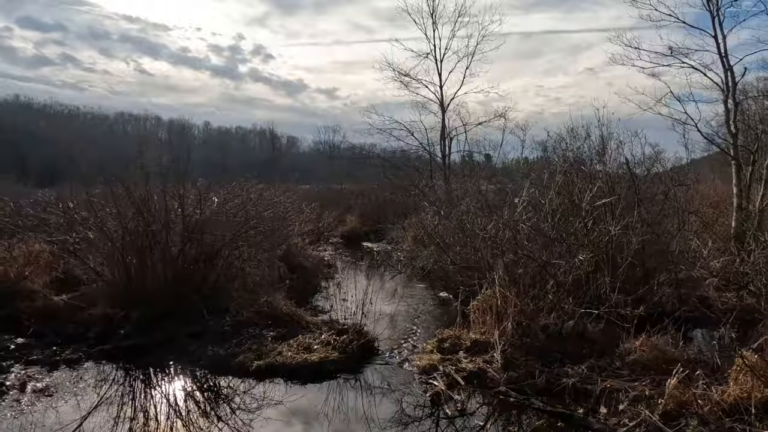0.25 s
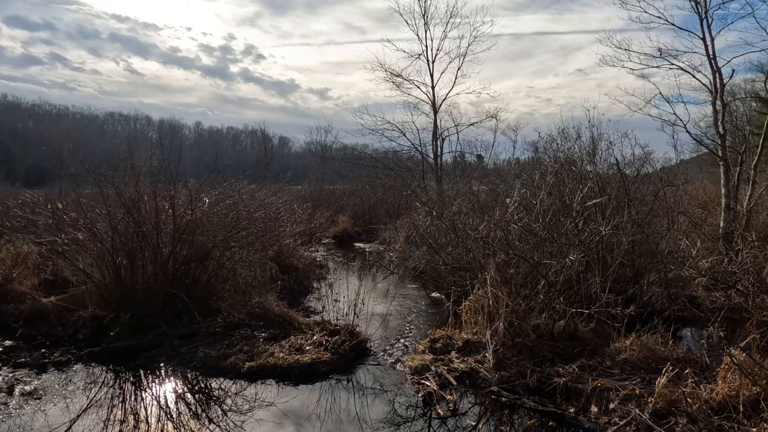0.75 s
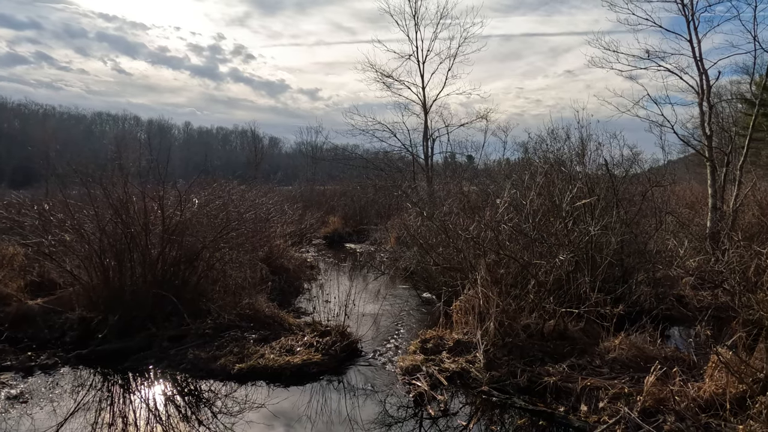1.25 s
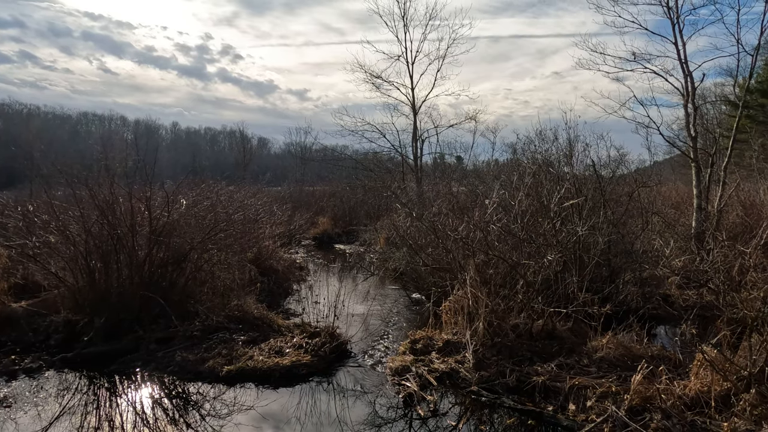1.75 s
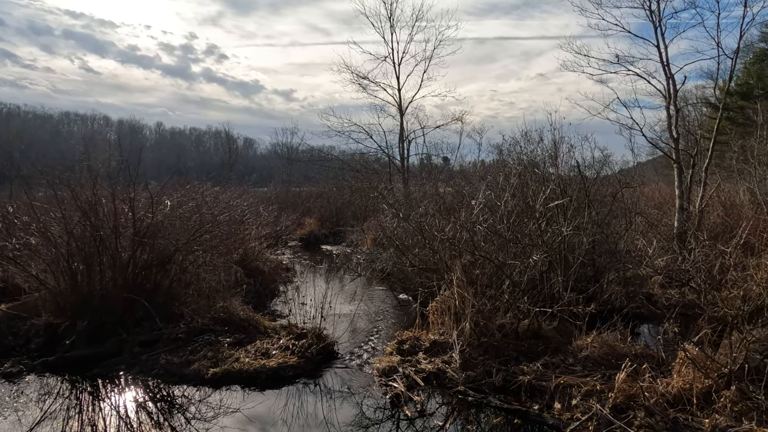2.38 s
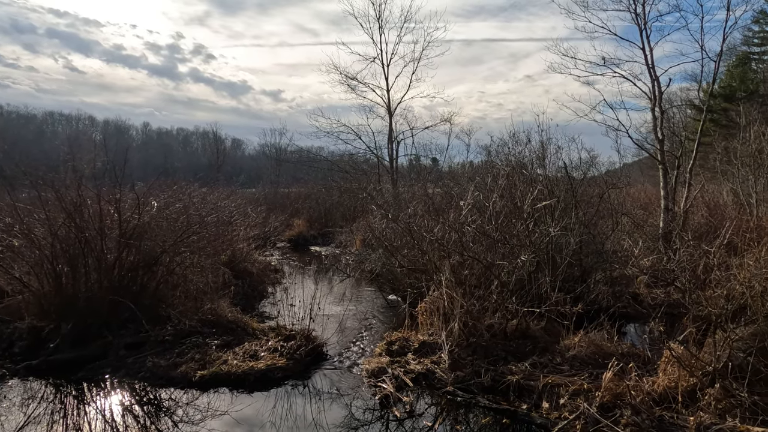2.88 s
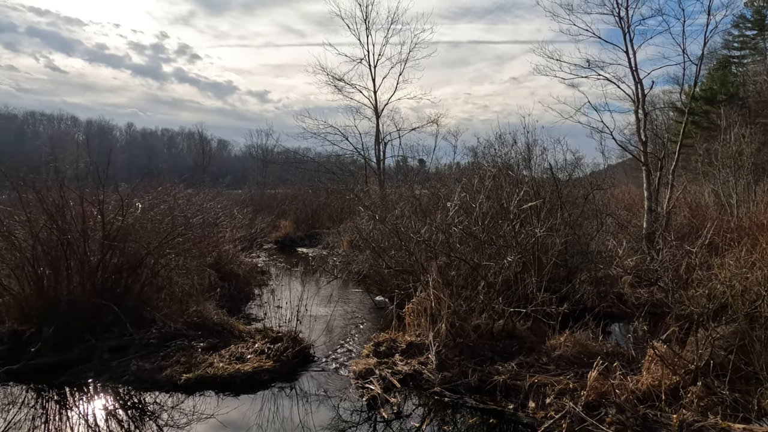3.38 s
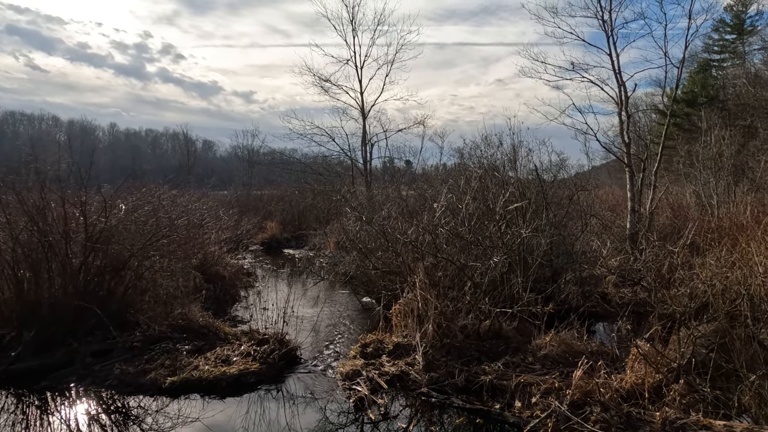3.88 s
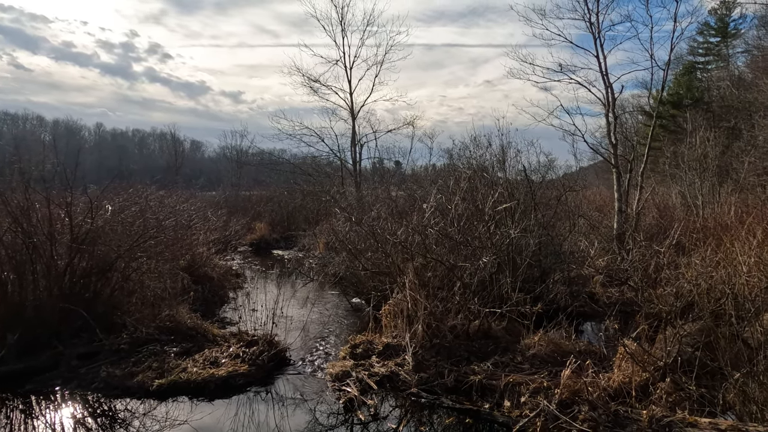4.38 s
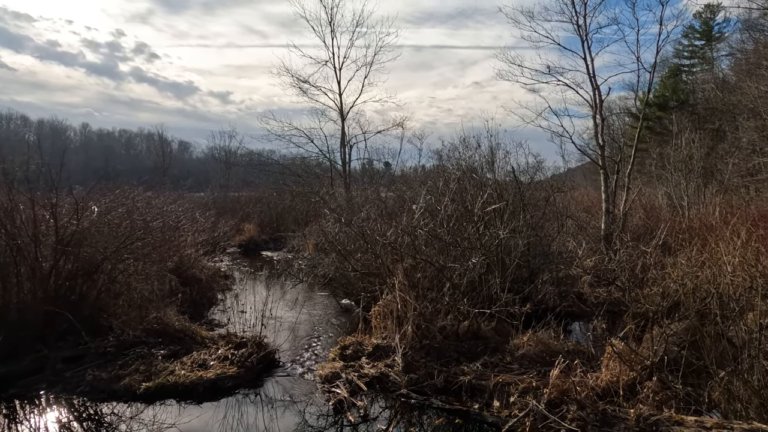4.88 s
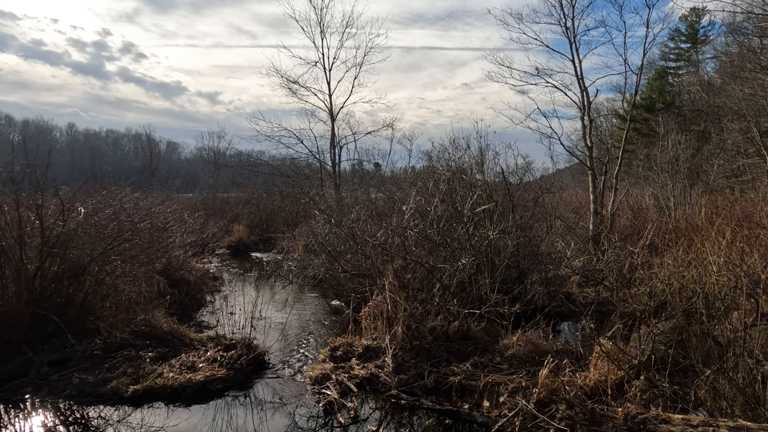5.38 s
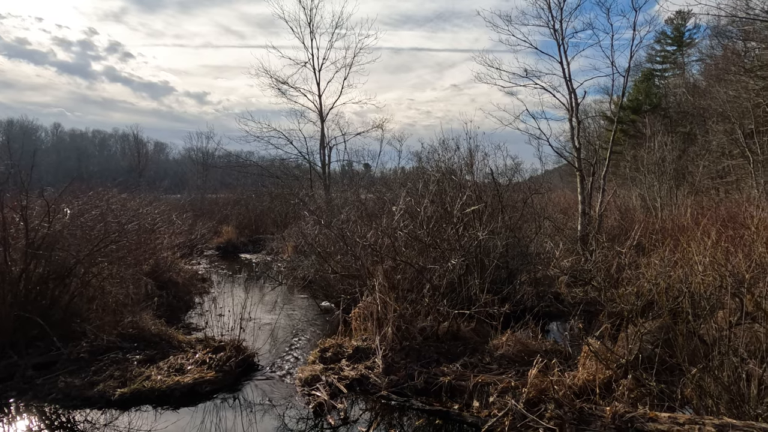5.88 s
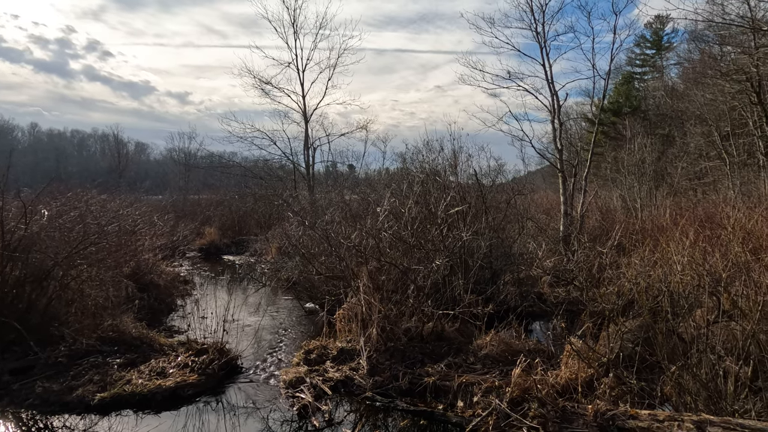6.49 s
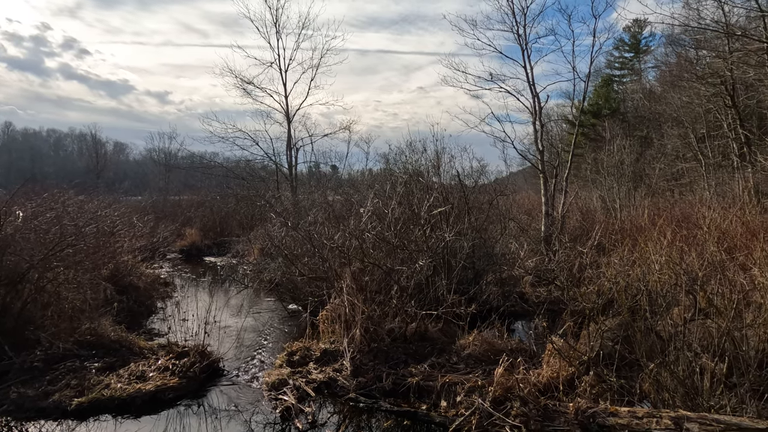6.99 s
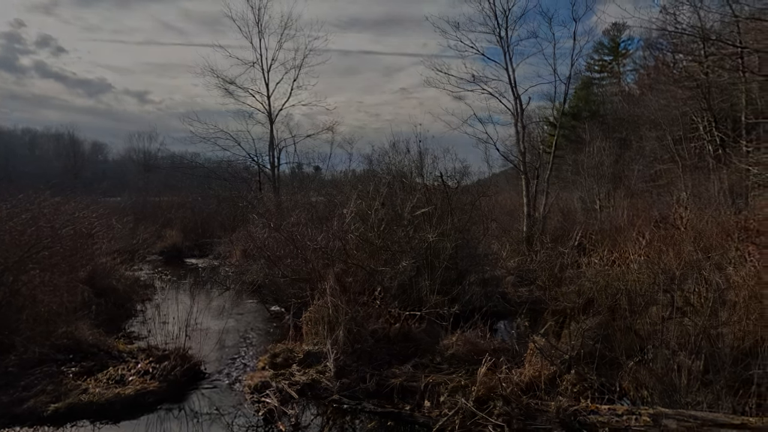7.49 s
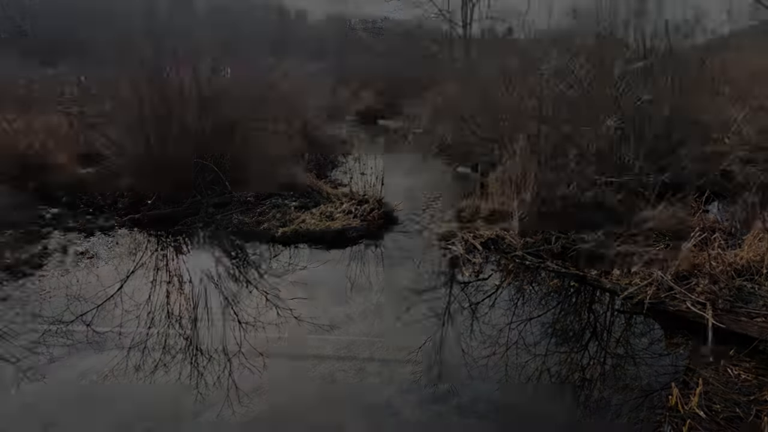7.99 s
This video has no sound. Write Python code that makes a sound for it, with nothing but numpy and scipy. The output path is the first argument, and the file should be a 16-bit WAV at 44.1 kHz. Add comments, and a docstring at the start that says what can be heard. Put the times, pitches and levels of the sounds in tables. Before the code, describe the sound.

A small brook trickles quietly through an open marsh for about eight seconds. Throughout, a crowd of tiny bubbles makes a fine gurgle over soft far-water wash and microphone hiss, gently swelling and easing. Nearby bubbles chirp in short, rounded plips, some rising in pitch, clustered in the first 0.7 seconds and again around 6 to 7; crisp droplet ticks are scattered between, a sharp one near 3.8. The hand-held microphone picks up powerful, very deep rumble, low shudder and dull knocks: a big thump at 1.0, smaller ones around 3.4, 3.7 and 5.5. A faint low hum wavers, clearest near 3.9. At about 7.35 the sound cuts dead with a click, stays silent for roughly a twentieth of a second, then fades smoothly back by 7.45. Bubbles and rumble continue to the end, in dry open air with only a very short scatter from the banks.

```python
"""Brook in an open marsh

Bubbles chirp and droplets tick, as ringing sines, over a wash of noise with random short-time spectra.
The trembling hand and light air shake the microphone: rumble and shudder are shaped noise, thumps are
sagging sines. A faint hum of narrow noise wavers. Near the end the sound cuts out and fades back in.
"""
import sys
import numpy as np
from scipy import signal
from scipy.fft import rfft, irfft
from scipy.io import wavfile
from scipy.ndimage import uniform_filter1d

SR = 44100
rng = np.random.default_rng(int(sys.argv[2]) if len(sys.argv) > 2 else 0)


def generate_wav(signal):
    """Clip the signal to [-1, 1] and save it as 16-bit WAV at the path in sys.argv[1]."""
    frames = np.transpose(np.atleast_2d(signal))
    scaled = np.clip(frames, -1, 1) * 32767
    pcm = np.round(scaled).astype(np.int16)
    wavfile.write(sys.argv[1], SR, pcm)


N = 363825

# Far water and hiss. Each row: frequency in Hz, relative density in dB per Hz.
WASH_SPECTRUM = [(110, -36), (180, 2.5), (225, 0), (310, -5), (500, -9), (1800, -11.5), (3800, -16.5),
                 (5800, -22), (8700, -23), (12000, -23.5), (16000, -26.5)]
# Flow of the brook. Each row: time in seconds, gurgle level in dB.
FLOW_LEVEL = [(0.0, -47), (0.48, -44), (0.85, -49), (1.22, -44.5), (1.61, -49.5), (2.02, -45.5),
              (2.55, -47), (2.75, -51), (2.82, -45), (3.03, -46), (4.8, -47.5), (5.2, -45.5), (6.2, -48),
              (6.78, -45), (7.31, -48.5), (7.7, -46.5), (8.25, -49)]
# Crowd of small bubbles. Each row: pitch in Hz, relative level in dB.
CROWD_LEVEL = [(350, -8.5), (700, -4.5), (1500, 0), (3000, 2), (5000, -3.5), (7500, -2.5), (11000, 2)]
# Shaking of the hand. Each row: time in seconds, deep rumble level in dB, housing shudder level in dB.
SHAKE_LEVELS = [(0.0, -12, -38), (0.35, -17, -39), (0.9, -20.5, -36), (1.17, -12.5, -38),
                (1.45, -18.5, -43.5), (1.85, -16, -36.5), (2.3, -17.5, -39.5), (2.8, -16.5, -38),
                (3.2, -18, -37.5), (3.6, -21, -35), (4.0, -19, -35.5), (5.2, -19, -40), (5.8, -19, -39),
                (6.2, -20.5, -41), (6.85, -15, -37.5), (7.05, -21, -42.5), (7.5, -15, -37),
                (7.9, -13, -40.5), (8.25, -17, -38)]
# Deep rumble before soft limiting. Each row: frequency in Hz, relative density in dB per Hz.
RUMBLE_SPECTRUM = [(1, -8), (2, 0), (4.5, 0), (7.5, -8), (14, -3), (20, -6), (30, -18), (38, -34),
                   (60, -70), (120, -140)]
# Shudder of the housing. Each row: frequency in Hz, relative density in dB per Hz.
SHUDDER_SPECTRUM = [(10, -58), (30, -24), (40, 5), (48, 4), (70, 2), (100, -7.5), (140, -5), (190, -15.5),
                    (260, -35), (500, -120)]
# Wavering hum. Each row: time in seconds, level in dB before the waver.
HUM_LEVEL = [(0.0, -50.5), (0.8, -47.5), (1.2, -56.5), (3.5, -53), (3.9, -44.5), (4.3, -52), (5.1, -50.5),
             (6.1, -57), (6.4, -47), (6.7, -53.5), (8.25, -56)]
# Loudest bubbles. Each row: start in seconds, nominal peak in dB, starting pitch in Hz,
# approximate time above half height in ms, pitch climb over that time as a share.
NEAR_BUBBLES = [(0.0621, -32, 3800, 1.1, 0), (0.0857, -29.5, 1330, 2.8, 0), (0.1086, -34, 3480, 1.3, 0),
                (0.1327, -31, 2750, 3.8, 0), (0.1609, -29, 2310, 4.3, 0.26), (0.238, -33, 3720, 2.2, 0),
                (0.2869, -36, 4580, 1.4, 0), (0.3087, -36.2, 5117, 1.1, 0), (0.3526, -31.5, 3383, 1, 0.24),
                (0.488, -31.5, 2620, 7.6, 0.19), (0.495, -34, 2500, 6.7, 0),
                (0.5064, -28.5, 3080, 2.8, 0.047), (0.537, -37, 4242, 0.8, 0.31),
                (0.5507, -37, 1380, 6.3, 0), (0.6234, -34.5, 827, 11, 0.042), (0.6748, -38, 990, 12, 0.096),
                (0.6959, -37.2, 1181, 17, 0), (1.0014, -32.5, 3750, 0.89, 0.084),
                (1.3229, -34, 1860, 2.9, 0.58), (1.4927, -34, 705, 13, 0.48),
                (1.639, -34.5, 1120, 15.3, 0.88), (1.6568, -23, 2950, 0.72, 0),
                (1.8722, -29, 3100, 1.9, 0.06), (1.989, -24.5, 2260, 2.1, 0.048),
                (2.018, -39, 406, 27, 0.52), (2.0538, -37.5, 765, 10, 0), (2.1548, -36, 2220, 5.5, 0.47),
                (2.1799, -36, 3540, 3.6, 0), (2.2777, -37, 3200, 2.8, 0), (2.4385, -35.7, 3162, 2.8, 0.06),
                (2.5456, -35.5, 1760, 4.8, 0.097), (2.6913, -37, 2080, 3.9, 0),
                (2.7977, -37, 2040, 7.9, 0.031), (2.9854, -36, 412, 28, 0.032),
                (3.0209, -35.5, 4630, 2.1, 0), (3.0358, -34.5, 736, 8.2, 0.036),
                (3.4255, -27, 2760, 2.1, 0), (3.7957, -34.5, 1225, 11.5, 0.13),
                (3.8027, -33.5, 3980, 1.1, 0), (3.881, -33.5, 1830, 3.1, 0.08),
                (4.0925, -39, 1430, 11, 0.028), (4.1665, -28.5, 3600, 1, 0.053),
                (4.2876, -33, 2170, 2.9, 0), (4.365, -38, 1900, 6, 0), (4.3785, -31, 2740, 2.5, 0),
                (4.59, -39, 1250, 8.4, 0.063), (4.791, -34, 2920, 2.7, 0.05), (4.8643, -31, 4870, 1.2, 0),
                (5.2425, -32, 2100, 4.1, 0.037), (5.2723, -36, 2136, 2.9, 0.16), (5.298, -42, 650, 21, 0),
                (5.3336, -36, 1940, 4, 0.79), (5.355, -36, 1440, 5.3, 0.016),
                (5.5003, -35, 1310, 3.9, 0.066), (5.6667, -36.5, 2190, 5.2, 0.27),
                (5.689, -33, 3230, 2, 0.072), (5.8225, -32.5, 1440, 5.3, 0.027),
                (5.9012, -32.5, 940, 4.7, 0.053), (5.9756, -37, 506, 18, 0.14),
                (5.9773, -37.5, 1084, 12.7, 0.06), (6.0544, -34, 540, 19, 0.31),
                (6.1989, -36.4, 2505, 3.3, 0.12), (6.231, -26, 3840, 3.4, 0), (6.2568, -26, 4130, 2.3, 0),
                (6.2698, -33, 630, 16, 0.37), (6.3471, -32, 4670, 0.93, 0), (6.4077, -29, 3665, 1.7, 0.038),
                (6.433, -30, 1000, 6.2, 0.13), (6.579, -32, 1520, 3.7, 0.1),
                (6.659, -32.5, 3809, 2.7, 0.022), (6.7337, -36, 1800, 2.8, 0), (6.814, -34, 4380, 2.9, 0),
                (6.8675, -39, 1360, 13, 0.61), (6.9202, -35.5, 747, 12, 0.068),
                (6.963, -34, 850, 4.5, 0.14), (6.965, -36.4, 3230, 3.8, 0.091), (7.2255, -32, 2230, 1.9, 0),
                (7.228, -36, 1080, 8.4, 0.09), (7.3058, -30, 3940, 1.7, 0), (7.4825, -23, 4650, 0.57, 0),
                (7.6229, -36.2, 1540, 6.2, 0.13), (7.6486, -24, 2671, 1, 0.17),
                (7.7798, -34.5, 1815, 3.3, 0.056), (7.8667, -37.5, 897, 17, 0.024),
                (7.9638, -35, 1440, 5.4, 0.1), (7.9853, -34.5, 1690, 7.9, 0),
                (8.0153, -31.5, 1330, 6.6, 0.32), (8.0556, -36, 1790, 5.3, 0.052)]
# Thumps of the grip on the housing. Each row: time in seconds, nominal peak in dB, starting pitch in Hz.
GRIP_THUMPS = [(0.099, -19, 106), (0.4985, -29.5, 125), (0.8057, -19, 106), (1.007, -6, 99),
               (1.2928, -22.5, 152), (1.7863, -19, 139.5), (1.917, -24, 135), (2.1234, -23.5, 100),
               (3.397, -15.5, 135), (3.456, -22, 147), (3.7463, -16.5, 138), (3.928, -28, 107),
               (3.9766, -25.5, 94), (4.324, -24.5, 86), (4.332, -29.5, 176), (4.6675, -24.5, 90),
               (5.1463, -24, 127), (5.5443, -15, 141.5), (6.645, -18.5, 108), (6.8195, -25.5, 96),
               (6.895, -24.5, 91.5), (7.1695, -23.5, 91), (7.4706, -24.5, 144), (7.598, -23.5, 94),
               (7.655, -23.5, 76.4), (7.7195, -28.5, 95), (7.962, -28, 94), (8.078, -29, 84),
               (8.1847, -26, 93)]
# Loudest droplet ticks. Each row: start in seconds, nominal peak in dB, centre in Hz.
NEAR_TICKS = [(0.3647, -31, 5670), (0.413, -33, 6030), (0.5342, -31, 5650), (0.617, -30, 6540),
              (1.092, -34, 6600), (1.4927, -31, 9400), (1.63, -29.5, 8200), (2.4167, -34, 7100),
              (3.0096, -28, 7100), (3.7602, -21.5, 9100), (4.1091, -34, 7700), (4.6498, -31, 8650),
              (4.8848, -31.5, 6860), (5.008, -33.5, 7300), (5.2133, -31, 5970), (5.2737, -32, 6900),
              (5.365, -31, 8800), (5.8416, -32, 6990), (5.916, -30.5, 8580), (6.3257, -33, 7240),
              (6.408, -30, 7950), (6.4343, -29.5, 4900), (6.597, -32.5, 7540), (6.789, -26, 7200),
              (7.017, -33, 7340), (7.648, -32, 7970), (7.7336, -36, 7110)]

WASH_DB, WASH_FOLLOWS = -47.5, .3  # level before swells; exponent on the flow gain
HUM_HZ, HUM_SKIRT_HZ = 306.3, 55.5  # centre; distance to the -9 dB points
TICK_CYCLES, RING_DB_PER_DB = 1.4, 0.1  # ring decay of a -31 dB tick; extra ring length per dB of strength
PORT_HZ, PORT_WIDTH_HZ, PORT_DB = 7430, 720, -3
CUT_S, BACK_S, FADE_S = 7.3435, 7.392, .06
CUT_HEIGHT = .115  # sample height just before the cut
EDGE_HZ = 15850


def gain_of(db):
    """dB to amplitude gain."""
    return 10 ** (np.asarray(db) / 20)


def evened(x):
    """Scales to rms 1."""
    return x / np.sqrt(np.mean(x ** 2) + 1e-20)


def read(points, hz):
    """Interpolates a spectrum on a log-frequency axis."""
    f, value = np.transpose(points)
    return np.interp(np.log(hz + .1), np.log(f + .1), value)


def curve(rows, axis):
    """One dB column of a curve, as gain at every sample."""
    rows = np.array(rows)
    return gain_of(np.interp(np.arange(N) / SR, rows[:, 0], rows[:, axis]))


def add(mix, start_s, sound):
    """Mixes a sound in at start_s, trimmed to the end."""
    part = mix[round(start_s * SR):][:len(sound)]
    part += sound[:len(part)]


def noise(spectrum):
    """Steady noise of a given spectrum, rms 1."""
    hz = np.fft.rfftfreq(N + 1, 1 / SR)
    white = rfft(rng.standard_normal(N + 1))
    return evened(irfft(white * gain_of(read(spectrum, hz)))[:N])


def drift(edge_hz):
    """Slow random curve of rms 1: noise whose spectrum is halved at edge_hz."""
    hz = np.fft.rfftfreq(N + 1, 1 / SR)
    white = rfft(rng.standard_normal(N + 1))
    return evened(irfft(white * (hz > 0) / (1 + (hz / edge_hz) ** 2))[:N])


def scatter(per_s, clump):
    """Random moments that gather in bursts, with four random numbers for each."""
    draws = rng.random((round(4 * per_s * N / SR), 6))
    busy = np.exp(clump * drift(9.) - clump ** 2 / 2)
    kept = draws[draws[:, 1] < busy[(draws[:, 0] * N).astype(int)] / 4]
    return np.c_[kept[:, 0] * N / SR, kept[:, 2:]]


def wash():
    """Far water and microphone hiss: random short-time spectra with drifting patches."""
    frames, hz = N // 128 + 5, np.fft.rfftfreq(512, 1 / SR)
    real, imag, patches = rng.standard_normal((frames, 257, 3)).T
    patches = uniform_filter1d(patches, 8, 0)  # across frequency
    patches = evened(uniform_filter1d(patches, 14, 1))  # across time
    patch_db = 2.0 * patches / (1 + hz[:, None] / 5000)  # the treble hiss is smoother
    spectra = (real + 1j * imag) * gain_of(read(WASH_SPECTRUM, hz)[:, None] + patch_db)
    return evened(signal.istft(spectra, nperseg=512, noverlap=384)[1][:N])


def bubble(hz, half_s, climb):
    """A pocket of air rings, wobbles and climbs in pitch as it nears the surface, then holds."""
    t = np.arange(0, 3 * half_s, 1 / SR)
    shape = (1 - np.exp(-t * hz / 0.16)) * np.exp(-.8 * (t / half_s) ** 1.38)
    # the pocket changes shape
    wobble = np.sin(2 * np.pi * (t * hz * rng.uniform(0.054, .16) + rng.random()))
    pitch_hz = hz * (1 + climb * 1.582 * np.tanh(t / half_s / 1.373) + 0.042 * wobble)
    turns = np.cumsum(pitch_hz) / SR
    return shape / shape.max() * (1 + 0.16 * wobble) * np.sin(2 * np.pi * turns)


def gurgle():
    """A crowd of small bubbles, every one different; low ones ring longer and some climb."""
    out = np.zeros(N)
    for start_s, pitch, size, ring, rise in scatter(per_s=700., clump=.45):
        hz = 350 * 30 ** pitch
        size_db = read(CROWD_LEVEL, hz) + 2.8 * min(-np.log(size), 2.5)
        cycles = (3.48 + 11.7 * ring ** 2) * (1000 / hz) ** 0.18
        add(out, start_s, gain_of(size_db) * bubble(hz, cycles / hz, climb=0.432 * rise ** 3))
    return evened(out)


def tick(hz, cycles):
    """A droplet strikes: a wide snap, then a few cycles of ring."""
    t = np.arange(0, 6 * cycles / hz + .0005, 1 / SR)
    envelope = np.sqrt(t * hz) * np.exp(-t * hz / cycles) / np.sqrt(cycles / 2 / np.e)
    ring = envelope * np.sin(2 * np.pi * hz * t)
    u = t / .00005
    return ring + 0.13 * (1 - u) * np.exp(-u)


def fizz():
    """Tiny droplets tick over a wide band; a few are large."""
    out = np.zeros(N)
    for start_s, pitch, size, ring, side in scatter(per_s=120., clump=1.0):
        size_db = 4.7 * min(-np.log(size), 3.5)
        drop = np.sign(side - .5) * tick(3500 * 3.07 ** pitch, .5 + 2.3 * ring)
        add(out, start_s, gain_of(size_db) * drop)
    return evened(out)


def rumble():
    """Deep noise as the hand and air shake the microphone; the widest swings are rounded off."""
    return curve(SHAKE_LEVELS, axis=1) * evened(np.tanh(0.36 * noise(RUMBLE_SPECTRUM)))


def shudder():
    """Lumpy low noise of the shaken housing."""
    lumps = gain_of(3.6 * np.minimum(drift(19.5), 1.3))
    return curve(SHAKE_LEVELS, axis=2) * evened(noise(SHUDDER_SPECTRUM) * lumps)


def hum():
    """A narrow band of noise that comes and goes."""
    band = [(1, -92), (HUM_HZ - 3 * HUM_SKIRT_HZ, -40), (HUM_HZ - HUM_SKIRT_HZ, -9), (HUM_HZ, 0),
            (HUM_HZ + HUM_SKIRT_HZ, -9), (HUM_HZ + 3 * HUM_SKIRT_HZ, -40), (2000, -90)]
    return curve(HUM_LEVEL, axis=1) * gain_of(1.7 * drift(2.4)) * noise(band)


def splash(db, half_s):
    """The pinch that traps a bubble throws a short wide spray."""
    t = np.arange(0, .02 + half_s, 1 / SR)
    spray = np.diff(uniform_filter1d(rng.standard_normal(len(t) + 1), size=4))
    decay = np.exp(-t / 0.00036) + 0.21 * np.exp(-t / (0.0061 + .3 * half_s))
    return gain_of(db) * evened(spray) * decay


def near_bubbles():
    """The loudest bubbles, each with the spray of its pinch."""
    out = np.zeros(N)
    for start_s, db, hz, half_ms, climb in NEAR_BUBBLES:
        add(out, start_s, gain_of(db) * bubble(hz, half_ms / 1000, climb))
        add(out, start_s, splash(db - 13, half_ms / 1000))
    return out


def thumps():
    """The grip knocks the housing: a short swing that sags in pitch, and a slow mode that rings."""
    out = np.zeros(N)
    for at_s, db, hz in GRIP_THUMPS:
        t = np.arange(0, .08, 1 / SR)
        u = t / .01136  # rise time in s
        sag = -np.sin(2 * np.pi * hz * t * (1 - 4.4 * t))  # the grip settles
        add(out, at_s - .004, gain_of(db) * (u * np.exp(1 - u)) ** 2.8 * sag)
        t = np.arange(0, .25, 1 / SR)
        sway_shape = (1 - np.exp(-t / 0.0051)) * gain_of(-60 * t / 0.13)
        sway = sway_shape * np.sin(2 * np.pi * 49 * t)  # slow mode of the housing
        add(out, at_s, gain_of(db - 0.5) * sway)
    return out


def near_ticks():
    """The loudest droplets; stronger ones ring longer."""
    out = np.zeros(N)
    for start_s, db, hz in NEAR_TICKS:
        cycles = TICK_CYCLES * gain_of(RING_DB_PER_DB * (db + 31))
        add(out, start_s, gain_of(db) * tick(hz, cycles))
    return out


def banks(x):
    """Reeds and muddy banks return a short scatter: a decaying noise tail."""
    t = np.arange(round(.06 * SR)) / SR
    tail = rng.standard_normal(len(t)) * gain_of(-60 * t / 0.038) * (t > .002)
    return x + gain_of(-6.5) * signal.oaconvolve(x, tail / np.linalg.norm(tail))[:N]


def brook():
    """Gurgle and fizz follow the flow, the wash less so; the loudest bubbles and ticks stand out near by."""
    flow = curve(FLOW_LEVEL, axis=1)
    swell = evened(flow) ** WASH_FOLLOWS * gain_of(0.66 * drift(4.0))
    far = gain_of(WASH_DB) * swell * wash()
    grains = gurgle() + gain_of(-12.5) * fizz()
    return far + flow * grains + banks(near_bubbles() + near_ticks())


def handling():
    """Hand and air on the microphone: rumble, shudder and thumps."""
    return rumble() + shudder() + thumps()


def scene():
    """Water, hand and hum."""
    return (brook() + handling() + hum())[None]


def record(dry):
    """The microphone port rings; the sound cuts dead, returns on a smooth fade, and is low-passed."""
    resonance = signal.lfilter(*signal.iirpeak(PORT_HZ, PORT_HZ / PORT_WIDTH_HZ, SR), dry)
    port = dry + gain_of(PORT_DB) * resonance
    t = np.arange(N) / SR
    # bends the rumble to a set height at the cut, so it clicks
    bend = CUT_HEIGHT - port[0, round(CUT_S * SR) - 1]
    port += bend * np.exp(-((t - CUT_S) / .015) ** 2)
    back = np.sin(np.pi / 2 * np.clip((t - BACK_S) / FADE_S, 0, 1)) ** 2
    gated = port * np.where(t < CUT_S, 1, back)
    low_pass = signal.firwin(1501, EDGE_HZ, window=("kaiser", 9), fs=SR)
    return signal.oaconvolve(gated, low_pass[None], "same")


dry = scene()
out = record(dry)
generate_wav(out)
```